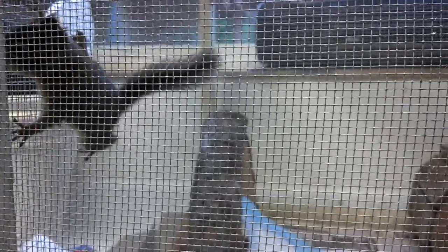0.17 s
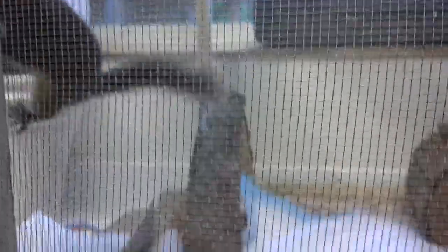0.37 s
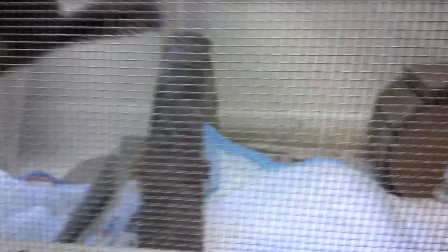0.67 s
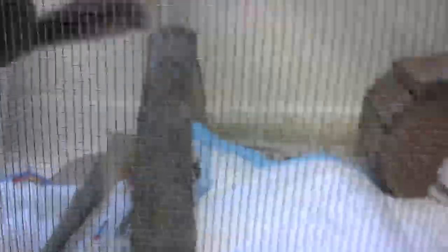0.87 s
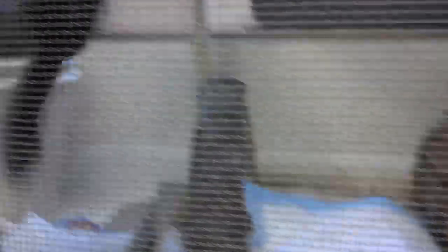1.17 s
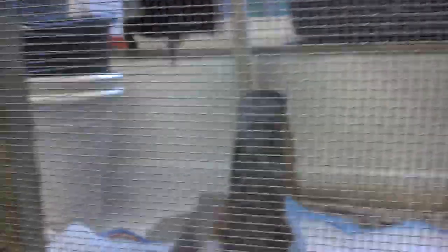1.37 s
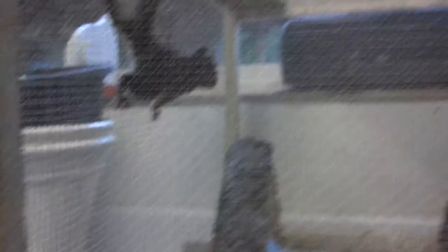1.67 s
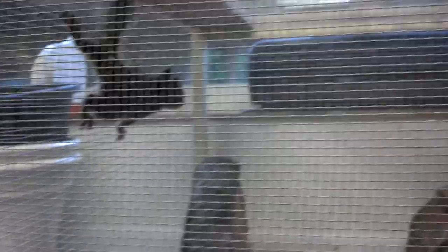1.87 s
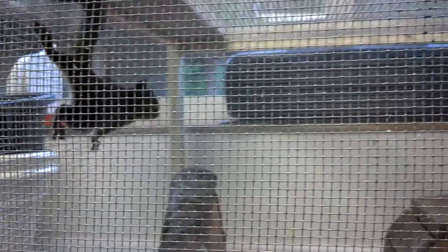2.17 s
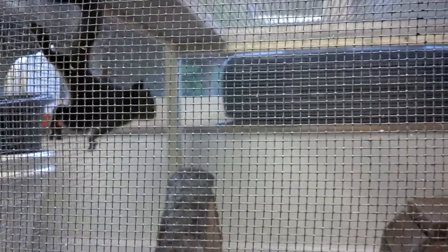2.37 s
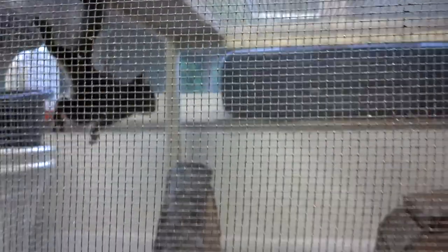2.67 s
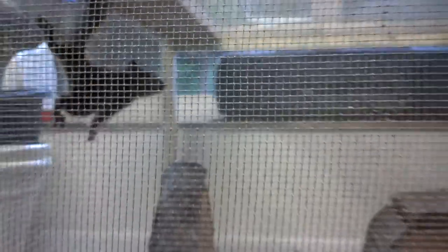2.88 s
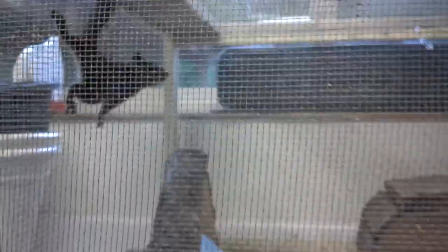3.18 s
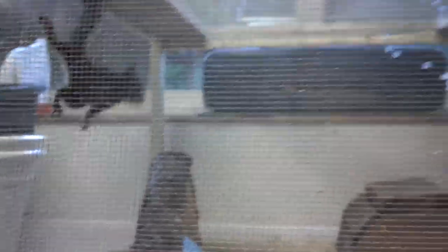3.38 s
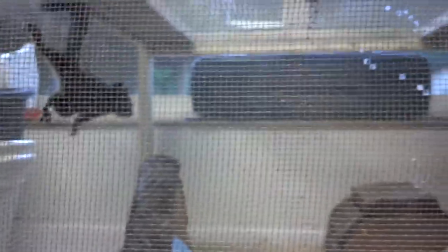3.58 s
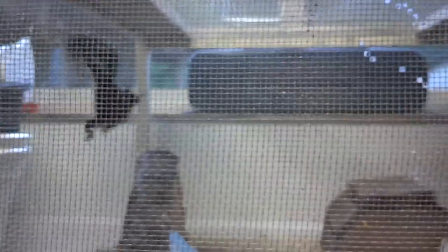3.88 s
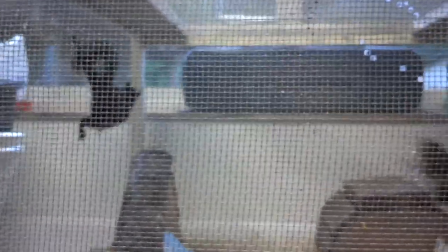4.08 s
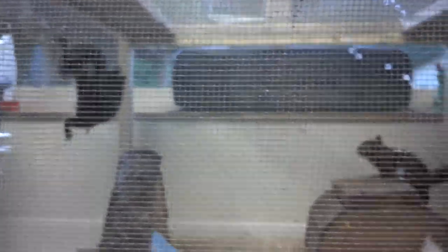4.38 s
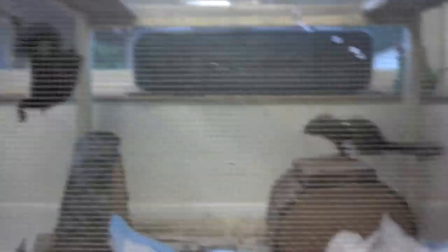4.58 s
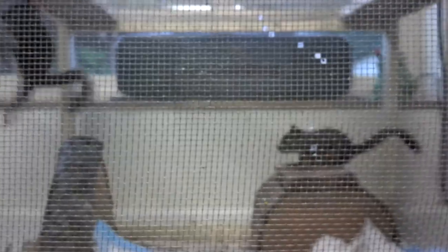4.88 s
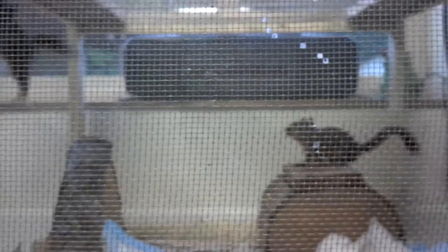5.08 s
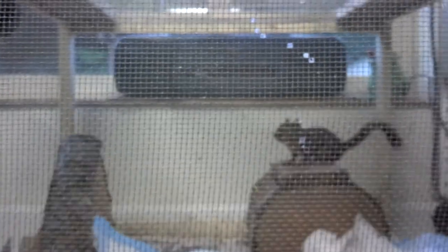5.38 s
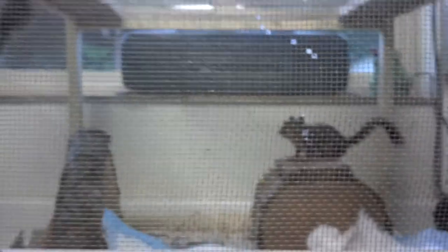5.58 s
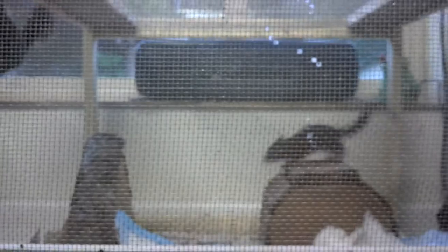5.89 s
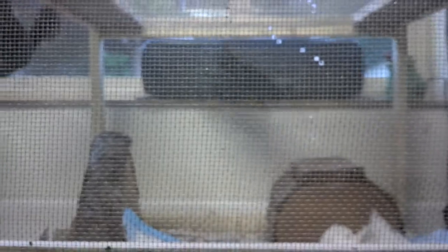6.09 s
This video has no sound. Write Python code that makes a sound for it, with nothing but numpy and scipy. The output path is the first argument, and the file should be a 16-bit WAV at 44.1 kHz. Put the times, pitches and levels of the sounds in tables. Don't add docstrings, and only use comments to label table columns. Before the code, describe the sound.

Young squirrels scrabble over a wire cage indoors, claws ticking and rasping in bursts, one landing hollowly on a pot amid soft fan hum.

```python
import sys
import numpy as np
from scipy import signal
from scipy.fft import rfft, irfft, next_fast_len
from scipy.io import wavfile
from scipy.ndimage import uniform_filter1d, map_coordinates

SR = 44100
rng = np.random.default_rng(int(sys.argv[2]) if len(sys.argv) > 2 else 0)


def magnitude_from_level(level_db):
    exponent = np.asarray(level_db, float) / 20
    return 10 ** exponent


def put_to_file(sound):
    columns = np.atleast_2d(sound).T
    safe = np.clip(columns, -1, 1)
    whole_steps = np.round(safe * 32767)
    wavfile.write(sys.argv[1], SR, whole_steps.astype(np.int16))


N = 275297


def unit(x):
    return x / np.sqrt(np.mean(x ** 2) + 1e-20)


def along(points, hz):
    f, v = np.transpose(points)
    return np.interp(np.log(hz + 1), np.log(f + 1), v)


def wobble(rate):
    knots = rng.standard_normal(int(N * rate / SR) + 4)
    return map_coordinates(knots, [np.arange(N) * rate / SR])


def filtered(x, response):
    m = next_fast_len(N + 8192)
    return irfft(rfft(x, m) * response(np.fft.rfftfreq(m, 1 / SR)), m)[..., :N]


def resonant(modes):
    def response(f):
        total = 0
        for k, (centre, width, db) in enumerate(modes):
            total = total + (-1) ** k * magnitude_from_level(db) * 1j * f * width / (centre ** 2 - f ** 2 + 1j * f * width)
        return total
    return response


def rush(spectrum):
    return unit(filtered(rng.standard_normal((2, N)), lambda hz: magnitude_from_level(along(spectrum, hz))))


def fading(s, db, t60, rise):
    start = round(s * SR)
    t = np.maximum(np.arange(N)[start:][:SR // 3] / SR - s, 0)
    return slice(start, start + len(t)), t, magnitude_from_level(db - 60 * t / t60) * (1 - np.exp(-t / rise))


def place(out, s, sound):
    part = out[:, round(s * SR):][:, :sound.shape[-1]]
    part += sound[..., :part.shape[1]]


# frequency in Hz, level in dB.
AIR_COLOUR = [(25, -23), (60, -13), (100, -0.5), (160, 1), (250, 3), (400, -0.5), (630, -7), (1000, -13),
              (1400, -18), (2000, -23), (4000, -28), (7000, -36), (10000, -35), (15500, -29)]


def room_air():
    return magnitude_from_level(-44.5 + 0.27 * wobble(1.87)) * rush(AIR_COLOUR)


# frequency in Hz, rms level in dB, unsteadiness in dB.
FAN_TONES = [
    (526.6, -44.5, 1.5),
    (197.1, -52, 2),
]


def fan():
    t, out = np.arange(N) / SR, np.zeros((2, N))
    for hz, db, sway_db in FAN_TONES:
        strength = magnitude_from_level(db + 4 + sway_db * wobble(13))
        out += strength * np.sin(2 * np.pi * hz * t + .45 * wobble(13) + [[0], [-.5]])
    return out


def pulses(share):
    mains_hz = 59.985
    u = (np.arange(N) / SR * mains_hz - share) % 1 - .5
    return np.sinc(601 * u) / np.sinc(u)


# frequency in Hz, width in Hz, level in dB.
LAMP_MODES = [(11400, 480, 0), (12300, 500, -9)]
# frequency in Hz, width in Hz, level in dB.
BALLAST_MODES = [(12150, 100, 0)]
# time in seconds, level in dB.
BALLAST_LEVEL = [(0, -73), (.7, -70), (1.8, -70), (2.6, -70), (4.5, -70), (4.9, -78), (6.24, -80)]


def lamp():
    t = np.arange(N) / SR
    strong = pulses(.07)
    clicks = strong - magnitude_from_level(-5) * pulses(.57)
    sizzle = clicks * magnitude_from_level(1.3 * wobble(25)) + magnitude_from_level(-27) * rng.standard_normal((2, N))
    buzz = unit(filtered(sizzle, lambda f: resonant(LAMP_MODES)(f) ** 2))
    whine = unit(filtered(sizzle + 2 * strong - clicks, lambda f: resonant(BALLAST_MODES)(f) ** 2))
    whine_level = magnitude_from_level(np.interp(t, *np.transpose(BALLAST_LEVEL)) + 2.5 * wobble(2.8))
    return whine_level * whine + magnitude_from_level(-62) * buzz


def stroke(s, length, rise, t60, db):
    start, stop = max(round((s - rise) * SR), 0), min(round((s + length + t60) * SR), N)
    t = np.arange(start, stop) / SR - s
    slope_db = 60 * np.minimum(t, 0) / rise - 60 * np.maximum(t - length, 0) / t60
    return slice(start, stop), magnitude_from_level(np.add.outer(db, slope_db)) ** 2


# start in seconds, length in seconds, effort in dB,
# weight on the frame in dB, grip on the wire in dB.
SCRAMBLES = [(0.0, 0.13, -54, -1, -12), (0.273, 0.2, -46, -2.5, -6.5), (0.882, 0.27, -48.5, -1.5, -9.5),
             (1.209, 0.083, -36, 3, -3.5), (1.322, 0.096, -36.5, 1.5, -7.5), (1.463, 0.09, -46.5, -10, -8),
             (1.635, 0.23, -47, -1.5, -8), (2.244, 0.13, -46, -0.5, -4), (2.684, 0.088, -45, -4.5, -2.5),
             (2.776, 0.12, -51, 2, -2.5), (2.919, 0.11, -46.5, -1, -16), (3.244, 0.14, -57, 4, -9),
             (3.515, 0.3, -57.5, 4.5, -7.5), (3.77, 0.057, -43, -3, -9.5), (3.838, 0.092, -45.5, 7.5, 0.5),
             (3.935, 0.084, -47, 3, -5), (4.044, 0.17, -51.5, 1.5, -4), (4.715, 0.064, -50.5, 7, 1),
             (4.809, 0.17, -56.5, 5, -1), (4.933, 0.11, -46.5, 5.5, -7.5), (5.104, 0.094, -53.5, 13.5, 6),
             (5.187, 0.099, -47.5, 9, 1)]
# start in seconds, length in seconds,
# effort in dB, weight on the frame in dB, grip on the wire in dB.
LEAPS = [
    (1.079, 0.11, -34, -3, -4.5),
    (2.11, 0.14, -44, -16, -0.5),
]
# time in seconds, effort in dB, weight on the frame in dB,
# grip on the wire in dB.
SCUFFS = [(0.185, -43, -6, -6), (0.23, -55, -5, -12), (0.374, -50, 9, -14), (0.535, -51, 4, -5.5),
          (0.6, -58.5, 7, -8), (1.445, -59, 5, -13), (1.559, -46.5, 4.5, -1), (1.653, -62, 15.5, -15),
          (1.9, -65, 12, 8), (1.61, -49, -4, -11), (2.42, -53, 0, 0), (2.61, -74, 22.5, 8),
          (2.655, -57, -8, 5.5), (3.038, -59, 13.5, 2), (3.085, -50.5, -3, -2), (3.162, -51.5, 2.5, -2),
          (3.412, -49, -2, -9), (3.452, -49, -0.5, -9), (4.3, -61.5, 9, -6), (4.52, -71, 20, -1),
          (4.6, -63, 8, 3), (4.633, -49.5, 2, -5.5), (5.07, -42, -7, -9), (5.33, -69.5, 23.5, 11),
          (2.509, -66, 0, 10), (5.836, -70.5, 22, -3), (5.93, -59.5, -1, 5.5), (5.988, -53.5, 6.5, -1.5),
          (6.159, -47, 8, 2.5), (6.215, -76, 26, 8)]


def scraping():
    strokes = [(s, length, 0.08, 0.19, *db) for s, length, *db in SCRAMBLES]
    strokes += [(s, length, .012, 0.19, *db) for s, length, *db in LEAPS]
    strokes += [(s, 0.0084, 0.15, 0.36, *db) for s, *db in SCUFFS]
    power = np.zeros((3, N))
    for s, length, rise, t60, db, weight_db, grip_db in strokes:
        at, part = stroke(s, length, rise, t60, db + np.array([weight_db, grip_db, 0]))
        power[:, at] += part
    grain = magnitude_from_level(.9 * wobble(60) + 2.6 * wobble(300))
    return power * grain ** 2


# frequency in Hz, level in dB.
RUMBLE_COLOUR = [(60, -16), (150, 5.5), (350, 3.5), (600, 3.5), (850, -1), (1250, -1.5), (1700, -7.5),
                 (2500, -3), (4000, -26), (8000, -28.5)]
# frequency in Hz, level in dB.
RASP_COLOUR = [(800, -21), (1800, -8.5), (3000, 2), (4300, -6.5), (5500, -0.5), (7500, -14.5),
               (10000, -13.5), (16000, -71)]
# frequency in Hz, level in dB.
HISS_COLOUR = [(3000, -15.5), (6000, -9), (8000, -7), (10000, -7), (12500, -7.5), (14000, -2),
               (15700, -1.5)]


def rubbing(power):
    noise = np.array([rush(RUMBLE_COLOUR), rush(RASP_COLOUR), rush(HISS_COLOUR)])
    return (np.sqrt(power)[:, None] * noise).sum(0)


# time in seconds, level in dB, pitch in Hz.
HAND_BUMPS = [
    (0.01, -50, 40),
    (0.49, -44, 45),
    (2.3, -60, 70),
    (2.79, -60, 60),
    (6.19, -50, 40),
]


def hand_bumps():
    out, t = np.zeros((2, N)), np.arange(SR // 5) / SR
    for s, db, hz in HAND_BUMPS:
        place(out, s, magnitude_from_level(db + np.array([[6], [0]]) - 60 * t / 0.16) * np.sin(2 * np.pi * hz * t))
    return out


# time in seconds, peak in dB,
# grip on the wire in dB.
SNAGS = [(0.082, -54, -16), (0.523, -43, -57), (0.543, -58, 5), (0.842, -50.5, 1), (0.944, -37, -24),
         (1.046, -34.5, -3), (1.27, -31, -17), (1.741, -55.5, 12.5), (1.859, -57.5, 18.5), (1.958, -67, 16),
         (2.061, -47, -13), (2.105, -65, 11), (2.73, -36, -14), (2.846, -55.5, 13), (3.338, -64, -6),
         (3.688, -52, -2), (3.743, -54, 10), (4.0, -34, -15), (4.239, -37, -25), (4.723, -58, 11),
         (4.739, -47.5, 7), (4.888, -34, -28), (5.062, -31, -31), (5.102, -65, 0), (5.123, -25.5, -15),
         (5.795, -58, -2), (5.831, -58.5, 14), (5.979, -69.5, -7), (6.109, -47, -6)]


def snags():
    power = np.zeros((3, N))
    for s, db, grip_db in SNAGS:
        at, t, env = fading(s, db - 4.5, 0.13, rise=0.0018)
        power[1:, at] += (env * magnitude_from_level([[grip_db + 2.5], [0]])) ** 2
    return power


# time in seconds, peak in dB, pitch in Hz.
WIRE_PLUCKS = [(0.0822, -51, 6380), (0.4873, -38.5, 3530), (1.045, -41, 3700), (1.0779, -27, 3220),
               (1.1508, -28, 3770), (1.2156, -27, 3100), (1.3359, -25, 4220), (1.4367, -32, 3200),
               (1.533, -35, 3330), (1.5564, -37, 3460), (1.768, -40, 4250), (1.8612, -41, 3980),
               (1.9584, -43.5, 4380), (2.1046, -45, 4100), (2.7297, -38, 4240), (2.9885, -40, 3800),
               (3.023, -35, 4170), (3.9998, -40, 3400), (4.0402, -38, 3800), (4.7235, -40, 3930),
               (4.9252, -51, 3280), (5.1253, -36, 3470), (5.168, -42, 4230), (5.8316, -50, 4050),
               (5.8526, -50, 4020), (6.1576, -36, 4770)]


def wire_plucks():
    out = np.zeros((2, N))
    for s, db, hz in WIRE_PLUCKS:
        at, t, env = fading(s, db + 1, .017, rise=.0004)
        out[:, at] += env * np.sin(2 * np.pi * hz * t + [[0], [rng.uniform(0, 2 * np.pi)]])
    return out


# time in seconds, peak in dB, centre in Hz.
SNAPS = [(0.0823, -44, 5000), (0.1691, -44, 4380), (0.4873, -42, 3500), (1.0451, -38, 3630),
         (1.078, -23, 2700), (1.128, -30, 3200), (1.151, -26, 3400), (1.1545, -28, 3700),
         (1.2157, -23, 2900), (1.2195, -29, 3400), (1.27, -30, 3000), (1.3364, -28, 4250),
         (1.357, -30, 4300), (1.4028, -34, 3630), (1.4355, -30, 2200), (1.4636, -36, 4500),
         (1.531, -39, 3530), (1.5565, -34, 4200), (1.654, -37, 2400), (1.7674, -40, 3700),
         (1.784, -37, 4150), (1.862, -35, 3900), (1.9585, -43, 4000), (2.1047, -40, 3240),
         (2.27, -36, 3200), (2.355, -40, 4500), (2.729, -36, 4080), (2.963, -40, 5500), (2.9885, -36, 3400),
         (3.007, -35, 5000), (3.0145, -36, 3200), (3.021, -26, 3300), (3.025, -34, 4200),
         (3.8796, -35, 3900), (3.9999, -34, 3380), (4.0403, -40, 3910), (4.1137, -31, 1600),
         (4.2104, -40, 4400), (4.7232, -41, 3970), (4.7397, -39, 3930), (4.9248, -39, 4630),
         (5.0649, -38, 4580), (5.126, -33, 3350), (5.1677, -35, 4080), (5.8322, -42, 4210),
         (5.8526, -41, 4200), (6.142, -40, 3710), (6.1579, -34, 4840)]


def snaps():
    out, t = np.zeros((2, N)), np.arange(SR // 5) / SR
    width_hz, overtone, echo_s = 600, 1.5, .0009
    for s, db, hz in SNAPS:
        tones = np.sin(2 * np.pi * hz * t) - np.sin(2 * np.pi * overtone * hz * t)
        click = magnitude_from_level(db - 1) * np.exp(-np.pi * width_hz * t) * tones
        echo = np.roll(click, round(echo_s * SR))
        place(out, s, click + 0.33 * echo * np.array([[1], [-1]]))
    return out


# time in seconds, peak in dB.
TICKS = [(0.083, -45), (1.044, -55), (1.076, -36), (1.5547, -39), (2.06, -43), (2.355, -57), (2.71, -34.5),
         (2.987, -40), (3.02, -49), (4.0013, -27.5), (4.214, -38), (6.1088, -41)]


def ticks():
    out = np.zeros((2, N))
    for s, db in TICKS:
        at, t, env = fading(s, db + 3, .005, rise=.0001)
        burst = signal.lfilter([1, .4, -.4], 1, rng.standard_normal((2, SR // 3)))
        out[:, at] += env * burst[:, :len(t)]
    return out


# time in seconds, peak in dB, panel pitch in Hz,
# sharpness in dB.
CATCHES = [(0.168, -43.5, 710, -19), (0.2338, -40.5, 1280, -25), (0.349, -42.5, 1210, -22),
           (0.385, -52, 1310, -19), (0.988, -45.5, 1260, -6), (1.0763, -37.5, 1320, -20),
           (1.149, -33, 1470, -13), (1.18, -31, 1200, -22), (1.217, -30, 1310, -18),
           (1.241, -34, 1220, -20), (1.302, -27.5, 1304, -8.5), (1.332, -42, 1340, 8.5),
           (1.4346, -22, 1182, -21), (1.556, -40, 885, -8), (1.654, -40.5, 1170, -29),
           (1.784, -44.5, 1210, 2), (2.269, -45, 1370, -23), (2.328, -42, 764, -23),
           (2.958, -48.5, 1150, 0), (3.006, -40.5, 1360, -4.5), (3.0324, -30.5, 1265, -33),
           (3.843, -42, 1110, -4), (4.039, -44, 1600, -7), (4.1142, -36.5, 1555, -28),
           (4.187, -43.5, 1640, -10), (4.634, -42, 1670, -29), (4.928, -40.5, 920, -3.5),
           (5.165, -35.5, 730, -4), (5.851, -44, 690, -14), (6.135, -43, 756, -30)]


def catches():
    power, plucks = np.zeros((3, N)), np.zeros((2, N))
    for s, db, hz, sharp_db in CATCHES:
        at, t, env = fading(s, db, 0.27, rise=0.00026)
        power[:, at] += (env * magnitude_from_level([[-16], [sharp_db + 1.0], [sharp_db + 0.5]])) ** 2
        ring = np.sin(2 * np.pi * hz * t + [[0], [rng.uniform(0, 2 * np.pi)]])
        plucks[:, at] += magnitude_from_level(db + 7 - 60 * t / .022) * ring
    return power, plucks


# time in seconds, peak in dB, time to fall by 60 dB in seconds.
THUMPS = [
    (0.2325, -39, 0.05),
    (1.15, -35, 0.05),
    (1.4338, -25, 0.032),
    (2.3, -40, 0.024),
    (3.031, -39, 0.026),
]
# frequency in Hz, width in Hz, level in dB.
FRAME_MODES = [(116, 22, 10), (235, 156, 10), (347, 105, 14), (553, 101, 11), (1220, 160, -37)]


def thumps():
    push = np.zeros(N)
    for s, db, t60 in THUMPS:
        at, t, env = fading(s + 0.002204, db, t60, rise=0.0028)
        push[at] += env * magnitude_from_level(19.0) * rng.standard_normal(SR // 3)[:len(t)]
        push[at.start] -= magnitude_from_level(db + 40.5)
    return filtered(push, resonant(FRAME_MODES))


# time in seconds, peak in dB, panel pitch in Hz.
TAPS = [(1.045, -42, 860), (1.116, -29, 1516), (1.1264, -29, 1266), (1.151, -21, 625), (1.27, -26, 1400),
        (1.354, -26, 1654), (1.374, -28.5, 1040), (1.4361, -26, 470), (1.436, -28, 1234),
        (1.557, -26.5, 570), (0.5424, -42, 1010), (1.209, -36, 1190), (1.741, -41, 1100),
        (1.8624, -44, 1300), (2.236, -44, 1310), (2.766, -40, 1670), (3.8132, -33, 1090),
        (3.887, -30, 1055), (3.9913, -41, 1130), (4.7386, -45, 1310), (2.305, -49, 900), (2.958, -43, 900),
        (3.007, -32, 885), (3.0337, -33.5, 1660), (3.043, -38, 1390), (4.118, -35.5, 1246), (5.0, -29, 700),
        (5.102, -45, 1370), (5.168, -32.5, 1620), (5.178, -27, 900), (5.195, -40, 754), (5.234, -35, 980),
        (5.262, -28.5, 670), (5.293, -35, 1010), (5.325, -40, 960)]


def taps():
    out, t = np.zeros((2, N)), np.arange(SR // 5) / SR
    for s, db, hz in TAPS:
        place(out, s, magnitude_from_level(db - 3.0 - 60 * t / 0.044) * np.sin(2 * np.pi * hz * t))
    return out


# time in seconds, level in dB.
SHAKING = [(1.06, -71), (1.128, -64), (1.152, -47), (1.192, -44), (1.248, -44), (1.41, -69), (1.434, -37),
           (1.522, -53), (1.75, -55)]
# frequency in Hz, level in dB.
SHUDDER_COLOUR = [(50, -23), (80, -3), (110, 2), (280, -0.5), (420, 3.5), (700, -35)]


def shudder():
    s, db = np.transpose(SHAKING)
    return np.interp(np.arange(N) / SR, s, magnitude_from_level(db + 7), 0, 0) * rush(SHUDDER_COLOUR)


# start in seconds, end in seconds, start pitch in Hz,
# end pitch in Hz, level in dB.
SQUEAL_STRANDS = [(2.13, 2.31, 2470, 2520, -52), (2.12, 2.3, 2780, 2720, -55),
                  (2.25, 2.47, 2130, 2310, -55), (2.29, 2.42, 2490, 2470, -53),
                  (2.42, 2.65, 2290, 2330, -58), (2.59, 2.75, 2440, 2500, -56),
                  (2.64, 2.75, 2900, 2980, -58), (2.23, 2.36, 1680, 1760, -59),
                  (2.31, 2.7, 1850, 1790, -61), (2.11, 2.4, 4700, 4650, -62), (2.59, 2.82, 4620, 5400, -62)]


def squeal():
    out = np.zeros((2, N))
    for start, end, start_hz, end_hz, db in SQUEAL_STRANDS:
        count = round((end - start) * SR)
        knots = round(.055 * start_hz * (end - start))
        blur = signal.resample(rng.standard_normal((2, 2, 200))[..., :knots], count, axis=2)
        phase = 2 * np.pi * np.cumsum(np.linspace(start_hz, end_hz, count)) / SR
        tone = blur[0] * np.cos(phase) + blur[1] * np.sin(phase)
        place(out, start, magnitude_from_level(db) * signal.windows.tukey(count, .5) * tone)
    return magnitude_from_level(2) * out


# time in seconds, peak in dB, time to fall by 60 dB in seconds,
# level of the upper modes in dB.
POT_LANDINGS = [
    (4.063, -35.5, 0.073, 5),
    (4.078, -44, 0.061, 13),
    (4.096, -44, 0.06, -6),
    (4.115, -20.5, 0.044, -22),
    (4.133, -34.5, 0.12, -4),
    (4.159, -43, 0.028, -9),
    (4.178, -41, 0.054, 7),
    (4.195, -38, 0.024, -10),
    (4.218, -43, 0.076, -4),
]
# frequency in Hz, level in dB.
POT_MODES = [(368, 7.5), (354, 3.5), (455, -20), (738, -8)]


def pot():
    out = np.zeros((2, N))
    for s, db, t60, upper_db in POT_LANDINGS:
        at, t, env = fading(s, db + 14.5, t60, rise=0.016)
        for hz, level in POT_MODES:
            mode_db = level + upper_db * (hz > 708)
            out[:, at] += env * magnitude_from_level([[0], [3]]) * magnitude_from_level(mode_db) * np.sin(2 * np.pi * hz * t + [[0], [1.6]])
    return out


# frequency in Hz, time to fall by 60 dB in seconds.
ROOM_T60 = [(200, 0.25), (2000, 0.16), (12000, 0.19)]


def room(x):
    hz, t, z = signal.stft(rng.standard_normal((2, SR // 3)), SR, nperseg=256)
    tail = signal.istft(z * magnitude_from_level(-60 * t / along(ROOM_T60, hz)[:, None]), SR, nperseg=256)[1]
    late = np.pad(x, (300, 0))[None]
    return signal.fftconvolve(late, tail / np.linalg.norm(tail[0]), axes=1)[:, :N]


# frequency in Hz, level in dB.
PORT_DIFFERENCE = [(30, -40), (60, 1), (125, -14), (250, -13), (500, -11.5), (1000, -3.5), (1600, 4.5),
                   (2200, -2.5), (16000, -1)]
# frequency in Hz, lean to the left port from -1 to 1.
PORT_LEAN = [(60, 0.094), (125, -.1), (250, 0.37), (500, -0.16), (2000, -0.066), (3000, 0.32),
             (11500, 0.28), (13000, -0.31), (15000, -.4)]


def scene():
    background = room_air() + fan() + lamp()
    burst_power, panel_plucks = catches()
    rubbed = rubbing(scraping() + burst_power + snags())
    plucks = panel_plucks + wire_plucks() + ticks() + snaps() + taps() + hand_bumps()
    blows = thumps() + pot()
    echoes = magnitude_from_level(-7.0) * room(blows[0] + magnitude_from_level(2.0) * plucks[0])
    common, other = rubbed + plucks + blows + echoes + squeal() + background + shudder()

    def spread(hz):
        lean = np.clip(along(PORT_LEAN, hz), -.9, .9)
        return magnitude_from_level(along(PORT_DIFFERENCE, hz)) * np.array([lean, np.sqrt(1 - lean ** 2)])

    apart = filtered(np.array([common, other]), spread).sum(0)
    return np.array([common + apart, common - apart])


# frequency in Hz,
# margin in dB, of which half counts in power.
SILENT_MARGIN = [(1200, -18), (2700, -15), (4000, -15), (5500, -14), (7000, -7), (8300, -5), (9600, -8),
                 (10700, -9), (11400, -16), (13500, -10), (15000, -13), (15700, -4)]
SHARP_TICKS = [.086, 1.038, 2.06, 2.083, 2.106, 2.362, 2.71, 3.02, 4.01, 5.125, 6.11]


def silence_weak_bands(ports):
    lead, open_hz = 289, 1150
    left, right = np.pad(ports, ((0, 0), (lead, 0))) / 2
    frame = dict(fs=SR, window="cosine", nperseg=2048, noverlap=1024)
    hz, t, z = signal.stft([left + right, left - right], **frame)
    first_bins = np.arange(0, 1025, 8)
    band = np.searchsorted(first_bins, np.arange(len(hz)), "right") - 1
    power = uniform_filter1d(np.add.reduceat(abs(z) ** 2, first_bins, axis=1), size=3, axis=2)
    mood = uniform_filter1d(rng.standard_normal(power.shape), size=3, axis=2)
    mood = unit(uniform_filter1d(mood, size=3, axis=1))
    margin = magnitude_from_level(along(SILENT_MARGIN, hz[first_bins])[:, None] + 7 * mood)
    attack = (abs(np.subtract.outer(t - lead / SR, SHARP_TICKS)) < 512 / SR).any(1)
    kept = (power > margin * power[::-1])[:, band] | (hz < open_hz)[:, None] | attack
    random_turn = np.exp(2j * np.pi * rng.random(z.shape))
    spill = magnitude_from_level(-15) * abs(z[::-1]) * random_turn * attack * (hz > open_hz)[:, None]
    z = (z * kept + spill) * (hz < 15860)[:, None]
    mid, side = signal.istft(z, **frame)[1][:, lead:lead + N] / 2
    return np.array([mid + side, mid - side])


def roll_off(x):
    return signal.sosfilt(signal.butter(12, 15960, fs=SR, output="sos"), x)


def record(dry):
    port_lag = 16
    late = np.pad(dry[::-1], ((0, 0), (port_lag, 0)))[:, :N]
    mix = silence_weak_bands(dry - late)
    return roll_off(mix)


dry = scene()
out = record(dry)
put_to_file(out)
```